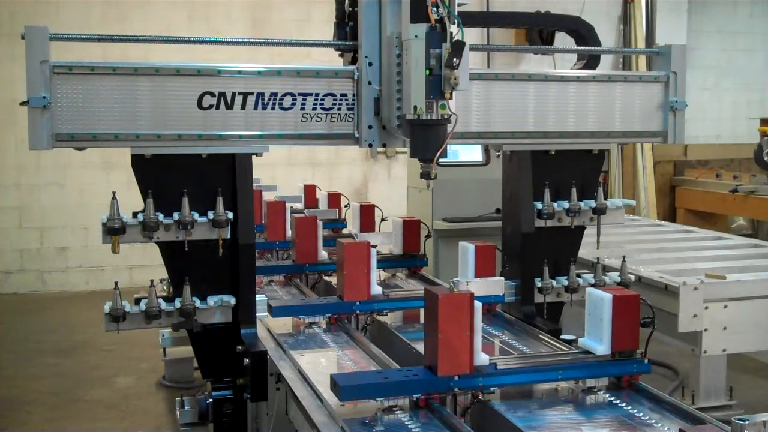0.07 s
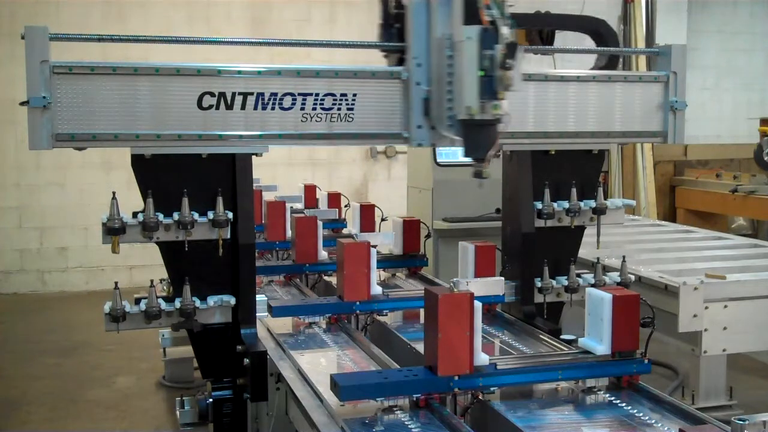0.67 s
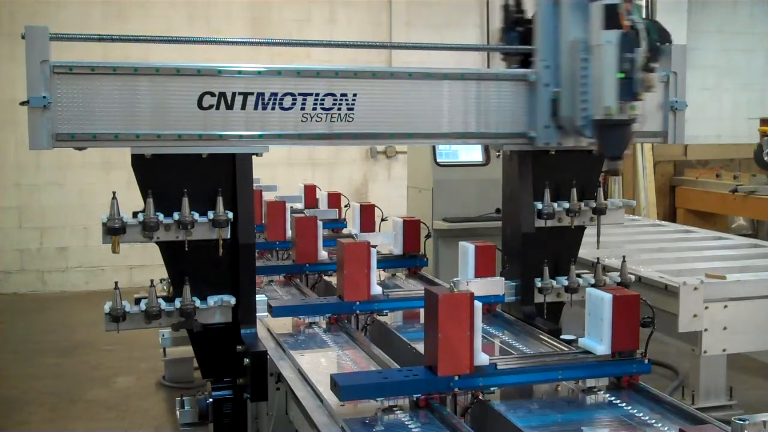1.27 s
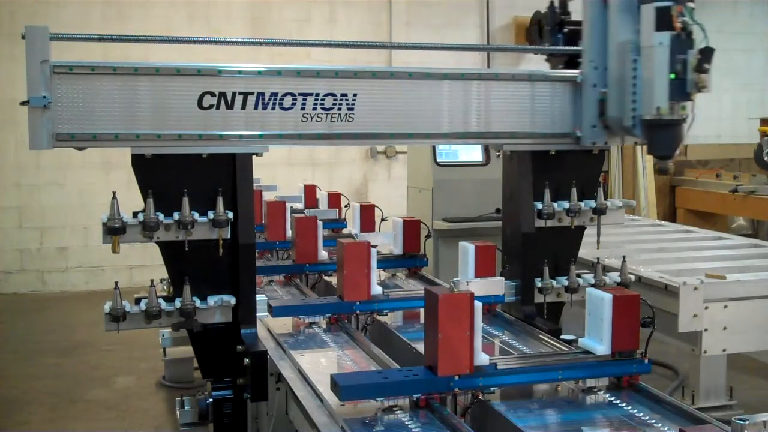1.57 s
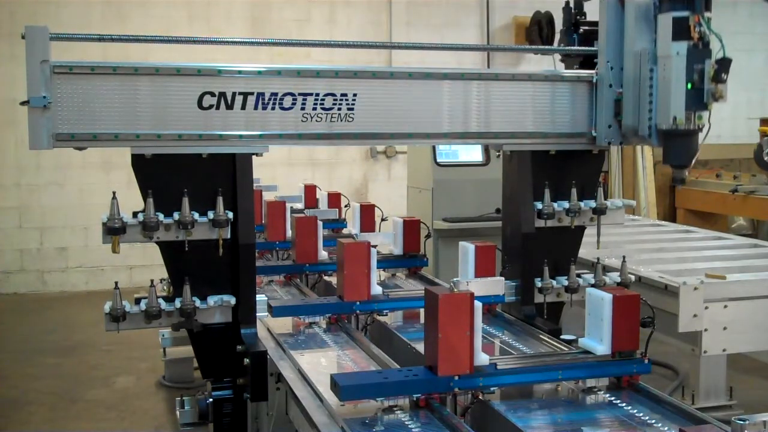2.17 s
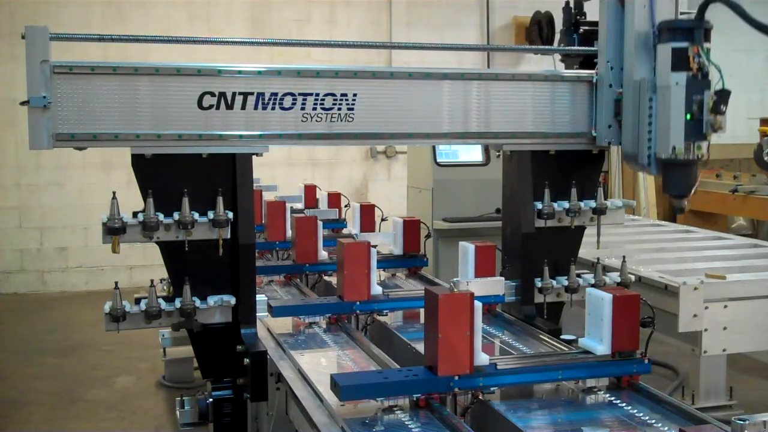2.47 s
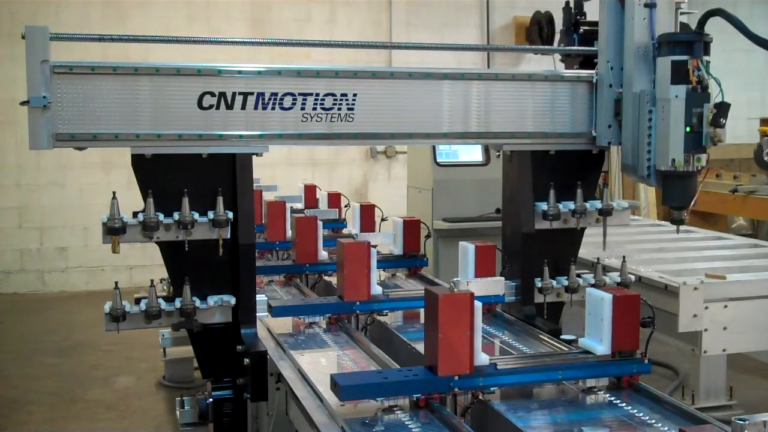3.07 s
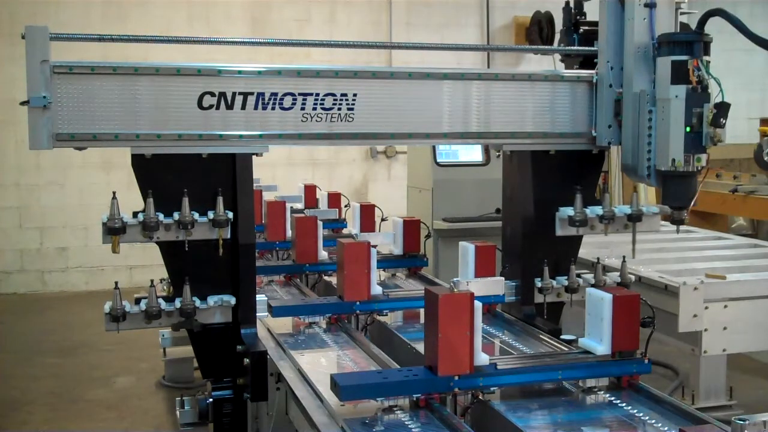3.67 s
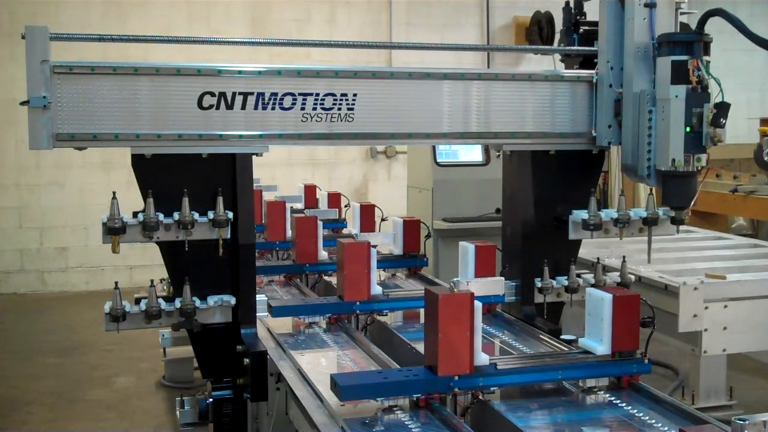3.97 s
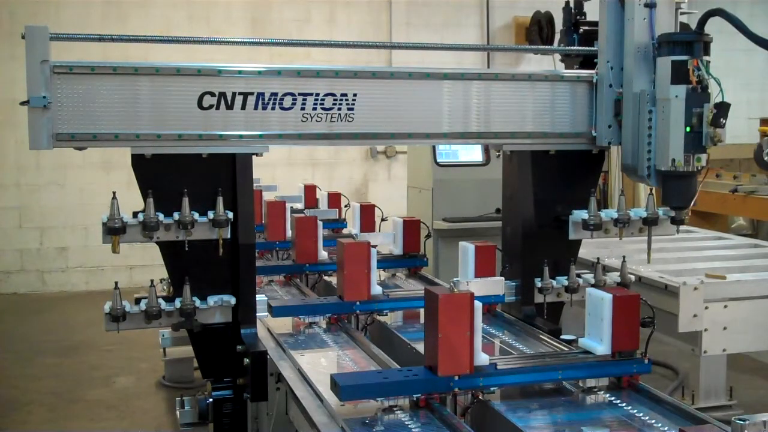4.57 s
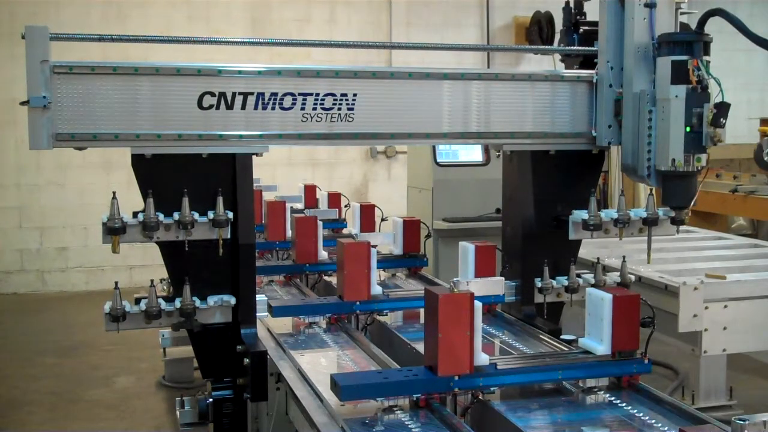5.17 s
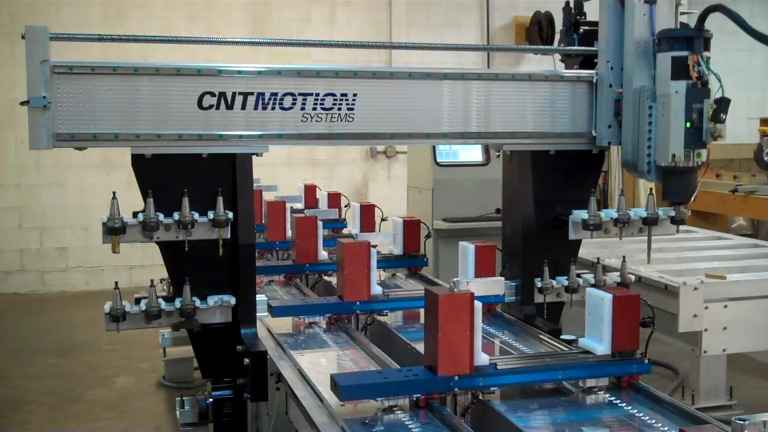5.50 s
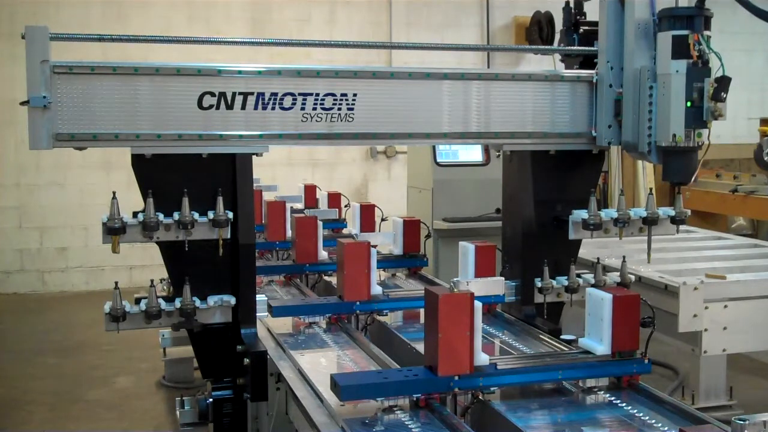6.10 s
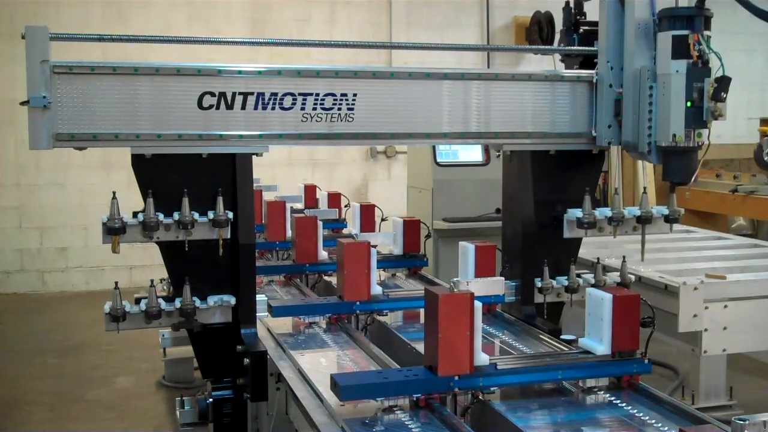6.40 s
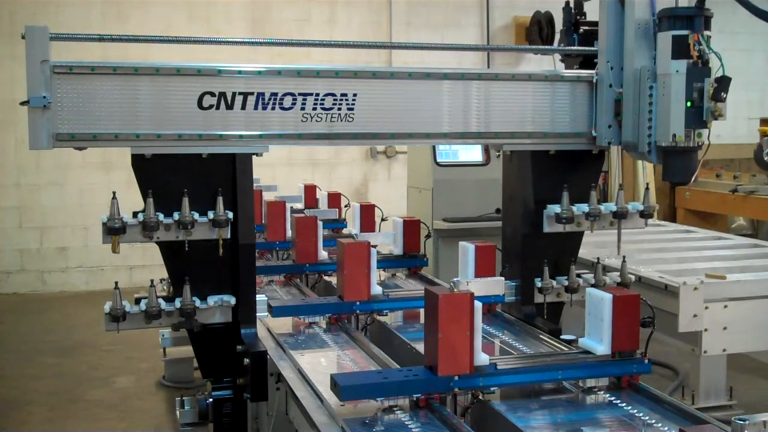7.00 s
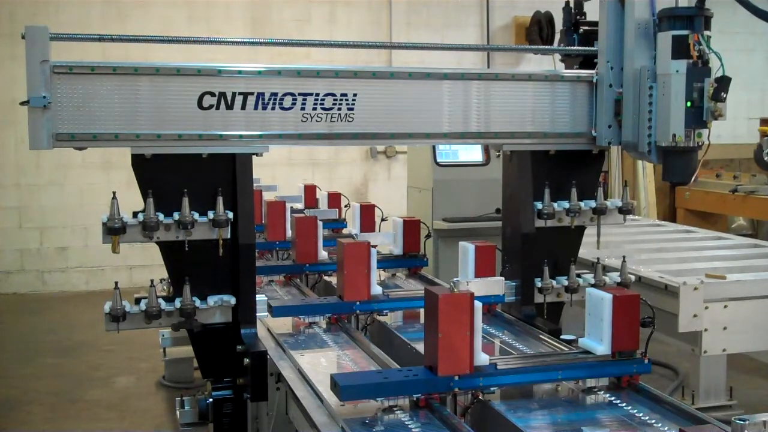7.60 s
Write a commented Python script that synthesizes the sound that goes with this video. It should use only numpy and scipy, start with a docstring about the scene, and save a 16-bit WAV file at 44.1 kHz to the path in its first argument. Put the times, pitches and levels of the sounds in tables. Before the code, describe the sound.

Fans, a humming pump and leaking compressed air run throughout in a slightly reverberant workshop, with a CNC router's spindle hissing on top. From about 0.5 seconds the head travels with a gear whine that rises, peaks near 1.2 and falls away by 2. At 2.3 a rough whine drops in pitch as the head lowers, with a rolling sound and swelling hiss. At 3 a valve spurts and a cylinder vents loudly until the tool rack hits its stop at 4.1 with a sharp, ringing metal clunk. The holder gives faint taps, then a dry knock at 4.6, over continuing hiss. At 5.6 bright spurts lead into a loud air blast with a hollow rising whistle, and another spurt comes at 6.1. From 6.3 the cylinder vents again, and the rack lands with a duller clunk at 7.7. The hiss is wide in stereo, brighter on the left.

```python
"""A workshop, where a CNC router changes its tool over fans, pump hum and leaking compressed air.
The spindle's air seal hisses as the head whines along the gantry on its gears, then drops. A cylinder
vents as it slides the tool rack in; the rack clunks on its stop and the holder knocks in its fork.
Valves spurt, air blasts through the spindle taper as it lifts off the tool, and the rack clunks back.
An automatic gain control ducks at the blows."""
import sys
import numpy as np
from scipy import signal
from scipy.fft import rfft, irfft, next_fast_len
from scipy.io import wavfile
from scipy.ndimage import uniform_filter1d, minimum_filter1d, map_coordinates

SR = 44100
rng = np.random.default_rng(int(sys.argv[2]) if len(sys.argv) > 2 else 0)


def inscribe(sig):
    """Save sig as 16-bit PCM at rate SR to the path in sys.argv[1].

    A 1-D sig is mono; a 2-D sig holds one channel per row.
    Samples are clipped to [-1, 1] before scaling.
    """
    pcm = np.round(np.clip(np.atleast_2d(sig).T, -1, 1) * 32767)
    wavfile.write(sys.argv[1], SR, pcm.astype(np.int16))


N = 346185

# gantry beam resonances, flaring as a whine sweeps through: centre_hz, width_hz, lift_db
BEAM = [(655, 90, 8), (1490, 91, 14), (2350, 60, 9.5)]


def amp(db):
    """Decibels to gain."""
    return 10 ** (np.asarray(db) / 20)


def unit(x):
    """Scale to rms 1."""
    return x / np.sqrt(np.mean(x ** 2) + 1e-20)


def along(points, hz):
    """Read a curve of (hz, value) points on a log frequency axis."""
    freqs, values = np.transpose(points)
    return np.interp(np.log(hz + 1), np.log(freqs + 1), values)


def resonance(peaks, hz):
    """Lift in dB that resonant peaks give at hz."""
    return sum(db / (1 + (2 * (hz - centre) / width) ** 2) for centre, width, db in peaks)


def ramp(x, start, length):
    """An S-shaped rise from 0 to 1."""
    return .5 - .5 * np.cos(np.pi * np.clip((x - start) / length, 0, 1))


def swell(middle_s, half_length_s):
    """A bell in time, 1 at its middle."""
    return np.exp(-((np.arange(N) / SR - middle_s) / half_length_s) ** 2)


def envelope(strokes):
    """Each stroke rises, sags while it holds (negative sag grows), then dies away."""
    t, power = np.arange(N) / SR, np.zeros(N)
    for start, attack, hold, t60, db, sag in strokes:
        age = np.maximum(t - start - attack, 0)
        level_db = db - sag * np.minimum(age, hold) - 60 * np.maximum(age - hold, 0) / t60
        power += (ramp(t, start, attack) * amp(level_db)) ** 2
    return np.sqrt(power)


def wobble(rate):
    """A smooth random curve, rate knots a second."""
    knots = rng.standard_normal(int(N * rate / SR) + 4)
    return unit(map_coordinates(knots, [np.arange(N) * rate / SR]))


def phase(hz):
    """Running angle of a changing frequency."""
    return 2 * np.pi * np.cumsum(hz) / SR + rng.uniform(0, 2 * np.pi)


def narrow(hz, width_hz):
    """A fuzzy tone of rms 1 around a moving pitch."""
    angle = phase(hz)
    return unit(wobble(width_hz) * np.cos(angle) + wobble(width_hz) * np.sin(angle))


def filtered(x, response):
    """Equalise x with a gain that depends on frequency."""
    size = next_fast_len(N + SR // 2)
    return irfft(rfft(x, size) * response(np.fft.rfftfreq(size, 1 / SR)), size)[..., :N]


def spread(pair):
    """Two unrelated signals become left and right: alike in the bass, wide in the treble."""
    # left-right likeness: freq_hz, correlation
    stereo_image = [(30, .5), (120, 0.87), (500, 0.99), (1300, 0.91), (2500, 0.89), (4000, 0.31),
                    (5500, 0.45), (8000, 0.092), (14000, -0.54)]
    likeness = lambda hz: np.clip(along(stereo_image, hz), -.6, .995)
    side = filtered(pair[1], lambda hz: np.sqrt((1 - likeness(hz)) / (1 + likeness(hz))))
    return np.array([pair[0] + side, pair[0] - side])


def rush(colour, cavity=()):
    """Stereo turbulence, lifted at its cavity's resonances; the colour sets tone, not level."""
    response = lambda hz: amp(along(colour, hz) + resonance(cavity, hz))
    return spread(unit(filtered(rng.standard_normal((2, N)), response)))


def hall(x):
    """The workshop's reverb; treble dies first."""
    # room decay: freq_hz, t60_s
    decay = [(100, 0.57), (300, 0.48), (1500, 1), (5000, 0.63), (12000, 0.06)]
    hz, t, noise = signal.stft(rng.standard_normal((2, SR)), SR, nperseg=256)
    fade = amp(-60 * t / np.maximum(along(decay, hz), .02)[:, None])
    tail = signal.istft(noise * fade, SR, nperseg=256)[1]
    tail = np.pad(tail / np.linalg.norm(tail[0]), ((0, 0), (300, 0)))  # 7 ms pre-delay
    return spread(signal.fftconvolve(x[None], tail, axes=1)[:, :N])


def panels(pair, count=8, strength=.17, reach_s=.012):
    """Close reflections off the machine's panels comb the sound, differently on each side."""
    def echoes(x):
        delays = rng.uniform(reach_s / 10, reach_s, count)
        return sum(rng.choice([-1, 1]) * np.roll(x, round(delay * SR)) for delay in delays)
    return np.array([x + strength * echoes(x) for x in pair]) / np.sqrt(1 + count * strength ** 2)


def jet(flow, colour, cavity, flutter_db):
    """Escaping air follows its valve and flutters a little."""
    flutter = amp(flutter_db * np.tanh(wobble(20) + wobble(50)))
    return envelope(flow) * flutter * panels(rush(colour, cavity))


def ring(modes, t, rattle):
    """Struck modes, each dying at its own speed; loose parts make their phases wander."""
    wander = lambda hz: rattle * map_coordinates(rng.standard_normal(size=200), [t * np.sqrt(hz)])
    return sum(amp(db + rng.normal(0, 1) - 60 * t / t60) * np.sin(2 * np.pi * hz * t + wander(hz))
               for hz, db, t60 in modes)


def workshop():
    """A bed of fans and a humming pump."""
    # pump hum: pitch_hz, level_db
    pump = [(119.7, -65.5), (241, -59.5), (483, -49)]
    # fan noise: freq_hz, density_db
    fan_colour = [(15, -68), (25, -65), (91, -25), (114, -17), (145, -18.5), (232, -10.5), (378, -9.5),
                  (448, -8.5), (473, -1), (676, -4), (1040, -7.5), (1210, -10), (1300, -5), (1600, -8),
                  (2200, -5.5), (2860, -23), (4840, -120)]
    # its resonances: centre_hz, width_hz, lift_db
    fan_peaks = [(501, 65, 3.2), (1050, 84, 7.2), (1330, 120, 2.7)]
    hum = sum(amp(db + 0.55 * wobble(3.93)) * np.sqrt(2) * np.sin(phase(hz + 0.77 * wobble(5)))
              for hz, db in pump)
    return hum + amp(-37 + .6 * wobble(5.3)) * rush(fan_colour, fan_peaks)


def leak():
    """Compressed air leaks in a constant hiss."""
    # leaking air: freq_hz, density_db
    colour = [(880, -54), (1500, -29), (1840, -25), (2920, -6.5), (3530, -8.5), (4380, -10.5), (6950, -3.5),
              (9480, -8), (14200, -20.5)]
    return amp(-33) * rush(colour)


def air_seal():
    """The spindle's seal hisses: head parked, head on its way, then tool seated in its fork."""
    # air flows: start_s, attack_s, hold_s, release_t60_s, level_db, sag_db_per_s
    parked_flow = [(-.02, .02, 1.05, .6, -27, 8.5)]
    moving_flow = [(-0.386, 0.916, 2.48, .9, -24.5, 0)]
    seated_flow = [(4.15, 0.11, 1.4, 0.52, -24.5, 1.4)]
    # hiss clear of the fork and in it: freq_hz, density_db
    free_colour = [(530, -39), (900, -14.5), (1200, -26), (1260, -17.5), (1620, -21), (1860, -18),
                   (2160, -17.5), (2950, -6.5), (3510, -10.5), (4910, -8.5), (6630, -5), (7700, -2.5),
                   (10300, -22.5), (14200, -25)]
    seated_colour = [(1060, -42), (1800, -15), (2920, -7.5), (3560, -5.5), (4700, -6.5), (5780, -1),
                     (6360, -6.5), (6990, 1.5), (7750, -3), (8750, -6), (9460, -35), (11200, -16.5),
                     (14200, -20)]
    # cavity resonances: centre_hz, width_hz, lift_db
    parked_cavity = [(1320, 100, 4.9), (3020, 310, 6), (4040, 350, 4.1), (5500, 400, 7.5), (7230, 120, 6.3)]
    moving_cavity = [(2970, 210, -2.5), (6200, 190, 5.5), (6850, 330, 2.5)]
    seated_cavity = [(2380, 1200, 1.5), (3570, 150, 7), (4160, 200, 2.5), (5100, 300, 3), (6040, 190, 7),
                     (6630, 150, 7.5), (7130, 200, 4), (9000, 500, -1), (10900, 600, -8)]
    # the hiss swells as the head passes, then twice as it drops: middle_s, half_length_s, lift_db
    swells = [(1.2, 0.5, 4), (2.412, 0.2, 2.5), (2.688, 0.12, 7)]
    swell_db = sum(db * swell(middle, half_length) for middle, half_length, db in swells)
    parked = jet(parked_flow, free_colour, parked_cavity, flutter_db=-0.5)
    moving = amp(swell_db) * jet(moving_flow, free_colour, moving_cavity, flutter_db=0.68)
    return parked + moving + jet(seated_flow, seated_colour, seated_cavity, flutter_db=0.8)


def gantry():
    """Gears whine higher and louder with speed; braking loads the other flanks and shifts the tone."""
    # gear mesh partials: shaft_multiple (rounded below), driving_db, braking_db, flicker_db
    gears = [(34, -25, -18, 2.5), (38, -10, -8, 3.5), (39, -15, -7, 2.5), (40, 1.5, -5, 2),
             (41, -9, -16, 4.5), (64.96, -12.5, -6.5, 3.5), (79.8, -13.5, -21, 3.5), (80.9, -18, -28, 2)]
    # guide bearings' roar: freq_hz, density_db
    bearings = [(150, -37), (300, -12.5), (480, -9), (750, -5.5), (1250, 1.5), (1800, -5), (2600, -15),
                (5000, -40)]
    start_s, speed_up_s, cruise_s, brake_s = .28, .78, .31, .8
    mesh_top_hz, teeth, servo_hunting = 1199, 40, 0.0031
    t = np.arange(N) / SR
    speed = ramp(t, start_s, speed_up_s) - ramp(t, start_s + speed_up_s + cruise_s, brake_s)
    mesh_hz = mesh_top_hz * speed * (1 + servo_hunting * wobble(24.94))
    speed_db = -26.5 + 6.5 * np.log2(np.maximum(speed, 1e-3))  # 6.5 dB per doubling of speed
    braking = np.interp(t, [1.25, 1.5], [0, 1])
    whine = np.zeros(N)
    for multiple, driving_db, braking_db, flicker_db in gears:
        hz = mesh_hz * round(multiple) / teeth
        load_db = driving_db + braking * (braking_db - driving_db)
        level_db = speed_db + load_db + resonance(BEAM, hz) + flicker_db * wobble(34.94)
        whine += amp(level_db) * np.sin(phase(hz))
    rolling = amp(speed_db - 6) * rush(bearings).mean(0)
    drive = ramp(mesh_hz, 410, 170) * (whine + rolling)  # the teeth start to sing over 410-580 Hz
    return amp(-0.5) * drive + amp(-8) * hall(drive)


def vertical_drive():
    """The head drops: a rough whine falls through the beam's flare; the slide rolls and drones."""
    # drive and slide strokes: start_s, attack_s, hold_s, release_t60_s, level_db, sag_db_per_s
    whine_stroke = [(2.27, 0.066, .45, .25, -35.5, 27)]
    slide_stroke = [(2.25, 0.092, 0.434, 0.27, -39, -16)]
    # slide bearings: freq_hz, density_db
    bearings = [(500, -30), (1200, -12), (1700, 1), (2550, -1), (3500, -14), (6000, -35)]
    # brief drones as the slide moves: middle_s, half_length_s, pitch_hz, level_db
    drones = [(2.642, 0.06, 186, -44), (2.89, .035, 199, -47), (6.0, .025, 200, -48), (6.14, .04, 200, -50)]
    fall_start_s, glide_s, top_hz, end_hz = 2.365, .105, 2000, 990
    age = np.maximum(np.arange(N) / SR - fall_start_s, 0)
    whine_hz = end_hz + (top_hz - end_hz) * np.exp(-age / glide_s)
    tone = amp(-3 + 0.71 * resonance(BEAM, whine_hz)) * narrow(whine_hz, width_hz=45)
    whine = envelope(whine_stroke) * (tone + amp(-3) * narrow(whine_hz, width_hz=700))
    rolling = envelope(slide_stroke) * rush(bearings)
    drone = sum(amp(db) * swell(middle, half_length) * np.sqrt(2) * np.sin(phase(np.full(N, hz)))
                for middle, half_length, hz, db in drones)
    return amp(-0.5) * whine + rolling + drone + amp(-8.5) * hall(whine)


def rack_cylinder():
    """The cylinder vents as it slides the rack in, and again on the way out."""
    # exhaust flows: start_s, attack_s, hold_s, release_t60_s, level_db, sag_db_per_s
    in_flow = [(2.98, 0.035, 1.215, 0.66, -18.5, 0.84)]
    out_flow = [(6.3, 0.38, 1.09, 1.8, -20, 1.3)]
    # exhaust hiss: freq_hz, density_db
    in_colour = [(410, -41), (700, -17), (1050, -14.5), (1590, -20), (1730, -16), (2370, -11), (3170, -10),
                 (3780, -7.5), (4400, -9.5), (7660, 0), (9250, -10.5), (9860, -20.5), (13500, -27.5),
                 (14200, -28)]
    out_colour = [(710, -45), (1200, -23), (1300, -21), (1420, -41), (1550, -22), (1830, -20.5),
                  (2660, -9.5), (3670, -10), (4150, -7), (5100, -7.5), (6680, -3), (7330, -0.5),
                  (11500, -25), (14200, -27)]
    # cavity resonances: centre_hz, width_hz, lift_db
    in_cavity = [(2560, 420, 2), (8000, 330, 2), (10550, 400, 4.6)]
    out_cavity = [(4120, 170, 4.8), (7360, 290, 1.3)]
    sliding_in = jet(in_flow, in_colour, in_cavity, flutter_db=0.3)
    return sliding_in + jet(out_flow, out_colour, out_cavity, flutter_db=0.3)


def valve_spurts():
    """Bright spurts of air as the rack's and the tool release's valves switch."""
    # spurts: start_s, attack_s, hold_s, release_t60_s, level_db, sag_db_per_s
    spurts = [(2.99, 0.032, .05, 1.6, -26, 0), (5.599, .003, .004, 0.093, -18.5, 0),
              (5.6, 0.023, 0.063, .3, -23, 0), (5.65, 0.052, .035, 0.83, -15.5, 0),
              (6.1, 0.022, 0.14, 1.2, -17.5, 0)]
    # valve hiss: freq_hz, density_db
    colour = [(1470, -33), (2500, -10.5), (2790, -13), (3520, -4.5), (4340, -7), (4700, -4), (5890, -7),
              (6480, 0), (8000, 0), (10700, -18), (14200, -21)]
    # cavity resonances: centre_hz, width_hz, lift_db
    cavity = [(3530, 310, 3.6), (6350, 200, 6.6), (8650, 210, 2.6)]
    return jet(spurts, colour, cavity, flutter_db=.5)


def rack_clunks():
    """The rack hits its stops: a thud, a metal crack, the frame's ring and the tools' jingle."""
    # blows: start_s, thud_db, frame_db, crack_db, steel_db, attack_s, thud_cutoff_hz
    blows = [(4.143, -5, -19.5, -5, -19, .0005, 2200), (4.186, -21, -22, -33, -36, .003, 420),
             (7.7298, -8, -23, -19, -43.5, 0.001, 1600)]
    # modes of the frame and the steel tools: pitch_hz, level_db, t60_s
    frame_modes = [(132, -12, .3), (182, -19, 0.28), (241, 1, .4), (261, 0, 0.26), (323, -1, .21),
                   (352.6, 0, .23), (561, -6, 0.23), (673, -10, 0.18), (930, -6, 0.13), (1133, -10, 0.19)]
    steel_modes = [(5930, -3, .15), (6500, 3, 0.39), (6780, -4, .2), (7600, 7, 0.22), (8120, -1, .5),
                   (8200, -1, .4)]
    # impact noise: freq_hz, density_db
    thud_colour = [(30, -50), (80, -25), (130, -14), (245, -0.5), (345, 3.5), (430, -8), (580, -1),
                   (780, -5), (1000, -2), (1350, -8), (1750, -8), (2600, -9), (5000, -11.5), (14000, -45)]
    crack_colour = [(300, -84), (2000, -11.5), (4500, -3), (6200, 6.5), (7800, -13), (9500, -10),
                    (14000, -33)]
    thud_t60_s, crack_t60_s = 0.089, 0.072
    out, t = np.zeros((2, N + SR)), np.arange(SR) / SR
    thud_noise, crack_noise = rush(thud_colour), rush(crack_colour)
    for start, thud_db, frame_db, crack_db, steel_db, attack, cutoff_hz in blows:
        at = rng.integers(N - SR)
        cushion = signal.butter(2, cutoff_hz, fs=SR)  # a cushioned stop is duller
        thud = amp(thud_db - 60 * t / thud_t60_s) * signal.lfilter(*cushion, thud_noise)[:, at:at + SR]
        crack = amp(crack_db - 60 * t / crack_t60_s) * crack_noise[:, at:at + SR]
        frame = amp(frame_db) * ring(frame_modes, t, rattle=0.68)
        jingle = amp(steel_db) * ring(steel_modes, t, rattle=1.6)
        out[:, round(start * SR):][:, :SR] += (thud + crack + frame + jingle) * (1 - np.exp(-t / attack))
    low_cut = signal.butter(3, 110, "highpass", fs=SR, output="sos")  # the clunks have no deep bass
    clunks = signal.sosfilt(low_cut, out[:, :N])
    return clunks + amp(-5.5) * hall(clunks.mean(0))


def holder_knocks():
    """The tool holder knocks in its fork, short and dry."""
    # knocks: start_s, level_db
    knocks = [(4.414, -33), (4.615, -31), (4.639, -19.5)]
    # holder modes: pitch_hz, level_db, t60_s
    modes = [(257, -17, 0.17), (338, -13, .18), (1020, 1, 0.045), (1097, 2.5, 0.04), (1450, -10, 0.044),
             (1820, 4, 0.03), (2210, -7, .035)]
    out, t = np.zeros(N + SR), np.arange(SR) / SR
    for start, db in knocks:
        out[round(start * SR):][:SR] += amp(db) * ring(modes, t, rattle=0.88) * (1 - np.exp(-t / 0.0008))
    return out[:N] + amp(-12) * hall(out[:N])


def taper_purge():
    """The purge blast whistles in the cone; its hollow tone rises as the gap to the tool opens."""
    # purge (spit, blast, last air), cone tone:
    # start_s, attack_s, hold_s, release_t60_s, level_db, sag_db_per_s
    flow = [(5.67, 0.022, .012, 0.46, -20, 0), (5.66, .3, 0.53, .8, -13.6, 5),
            (6.5, .08, .12, 1.9, -23.5, 4)]
    hollow_stroke = [(5.64, 0.14, 0.64, 0.73, -32, 5)]
    # purge hiss: freq_hz, density_db
    colour = [(1000, -41), (1700, -15), (2050, -16), (2220, -20), (2400, -18), (2720, -12.5), (3310, -8.5),
              (3990, -11), (5210, -1), (7170, -8.5), (8120, -10), (9110, -27), (10200, -21.5), (14200, -25)]
    # cone resonances: centre_hz, width_hz, lift_db
    cone = [(3300, 400, 4), (4730, 200, 5), (4900, 150, 1), (5140, 190, 4), (5280, 110, 3.5),
            (5440, 150, -4.5), (5670, 170, 7.5), (6430, 240, 6.5), (8260, 300, 8)]
    gap_start_s, opening_s, shut_hz, open_hz = 5.69, .17, 1030, 1453
    hollow_hz = shut_hz + (open_hz - shut_hz) * ramp(np.arange(N) / SR, gap_start_s, opening_s)
    core = amp(-0.5) * narrow(hollow_hz, width_hz=220)
    breath = amp(-4.5) * narrow(hollow_hz, width_hz=700)
    return envelope(hollow_stroke) * (core + breath) + jet(flow, colour, cone, flutter_db=0.5)


def scene():
    """The tool change over the workshop bed, in stereo."""
    return (workshop() + leak() + air_seal() + gantry() + vertical_drive() + rack_cylinder()
            + valve_spurts() + rack_clunks() + holder_knocks() + taper_purge())


def duck(x, threshold_db, hold_s, ease_s):
    """Gain control: loud moments pull the gain down; it holds, then eases back."""
    power = np.abs(uniform_filter1d(np.mean(x ** 2, axis=0), size=300)) + 1e-12
    needed_db = np.minimum(0, threshold_db - 10 * np.log10(power))
    half = int(hold_s * SR / 2)
    held_db = minimum_filter1d(needed_db, 2 * half + 1, origin=half)
    pole = np.exp(-1 / (ease_s * SR))
    return x * amp(signal.lfilter([1 - pole], [1, -pole], held_db))


def record(dry):
    """The left microphone port is much brighter; then gain control, overload and a band limit."""
    # balance of the ports: freq_hz, left_minus_right_db
    balance = [(60, -4), (91, -4), (140, -2), (210, -2.5), (320, -1), (490, -1.5), (740, -1.5),
               (1120, -1.5), (1700, -0.5), (2580, -0.5), (3920, -0.5), (5960, -3.5), (9050, 13),
               (13800, 14.0)]
    ports = lambda hz: np.sqrt(2 / (1 + amp(np.outer([-2, 2], along(balance, hz)))))
    ducked = duck(filtered(dry, ports), threshold_db=-12.8, hold_s=0.11, ease_s=0.076)
    return filtered(np.clip(ducked, -1, 1), lambda hz: hz < 14330)


dry = scene()
out = record(dry)
inscribe(out)
```